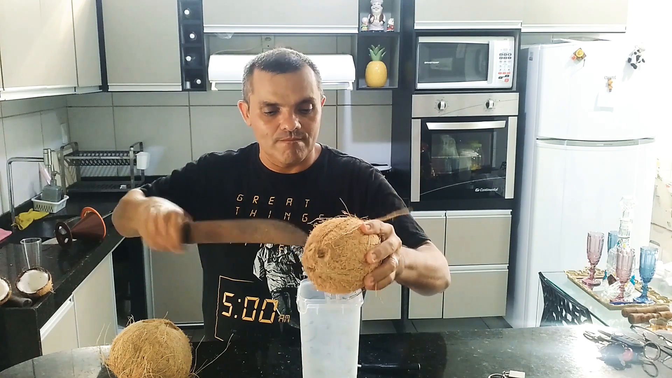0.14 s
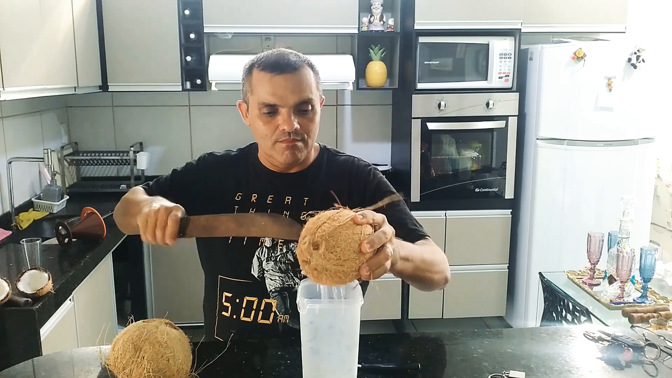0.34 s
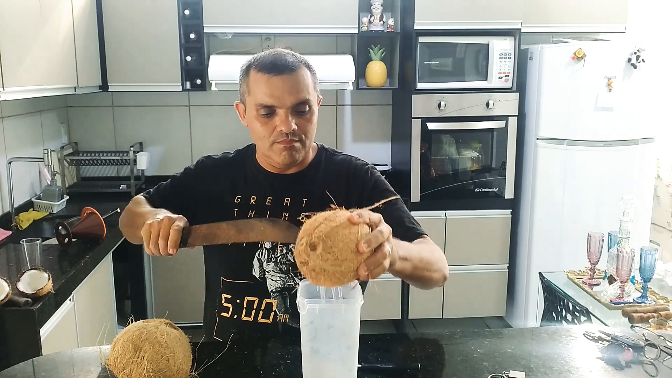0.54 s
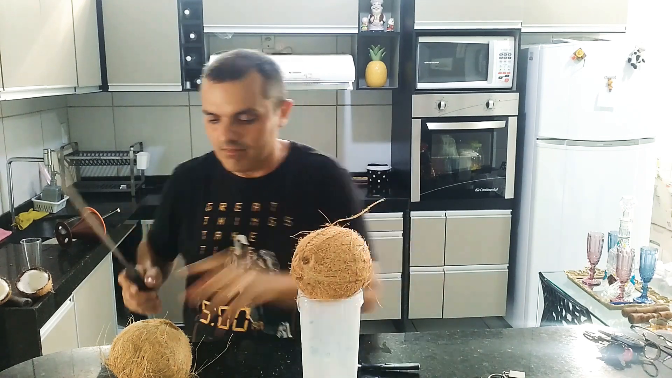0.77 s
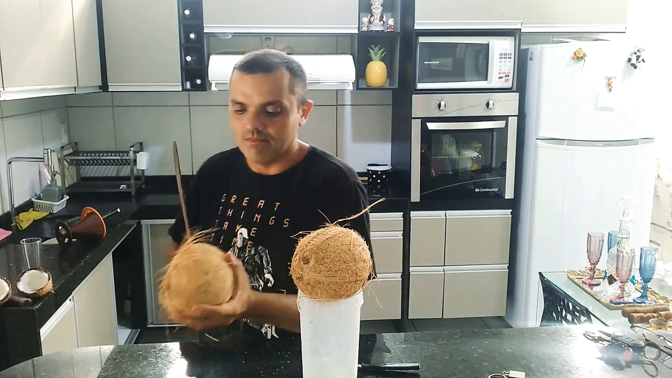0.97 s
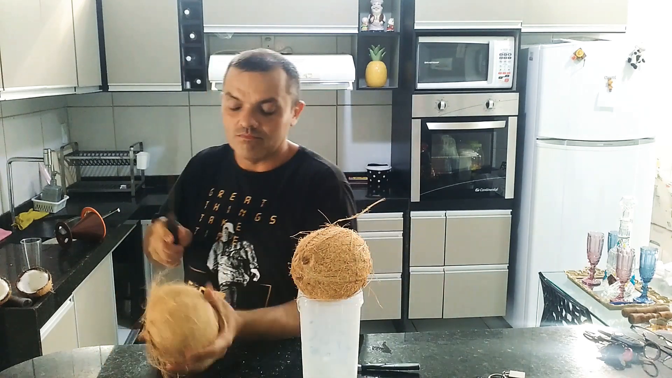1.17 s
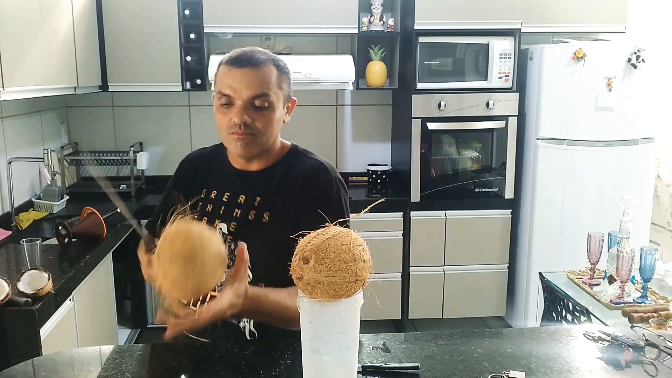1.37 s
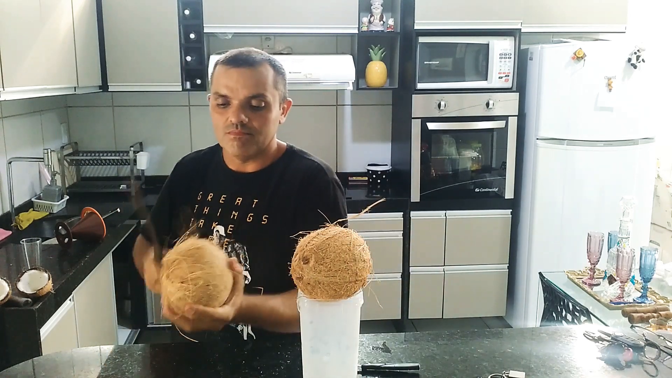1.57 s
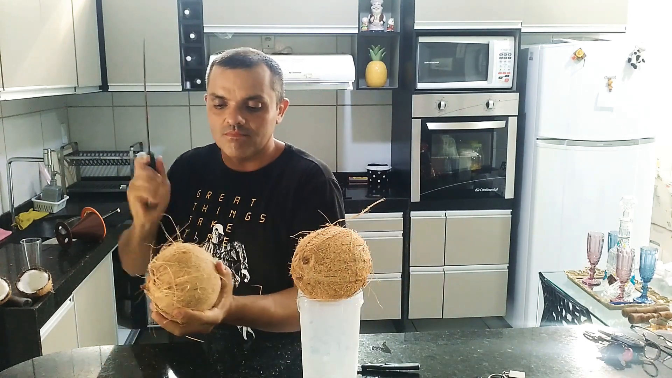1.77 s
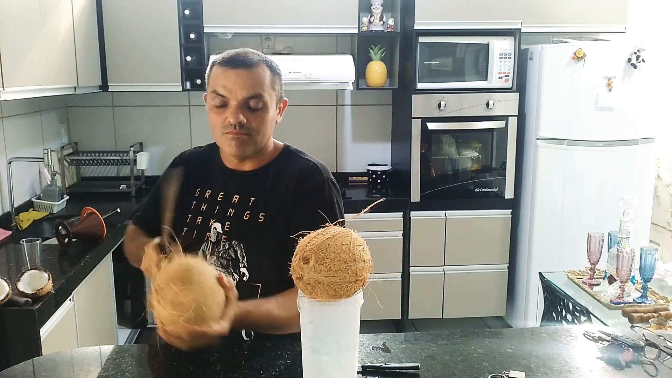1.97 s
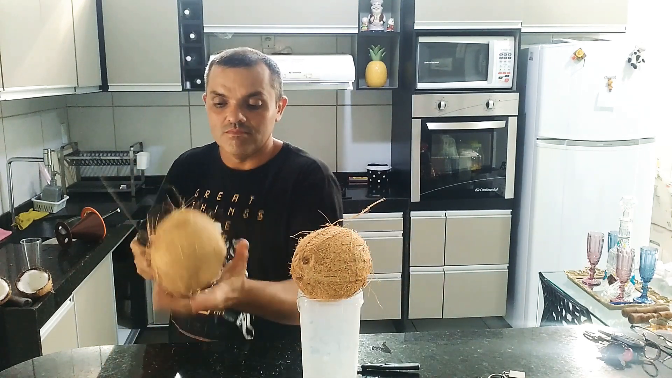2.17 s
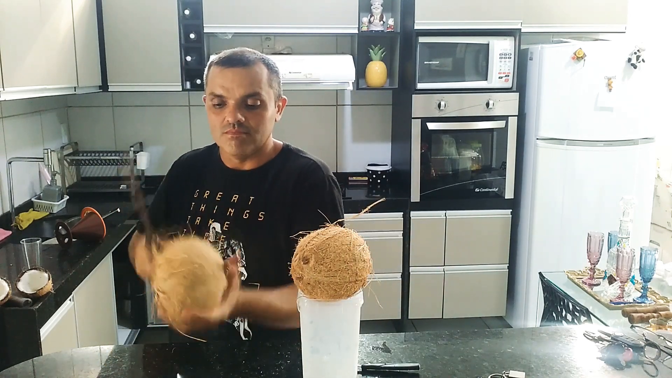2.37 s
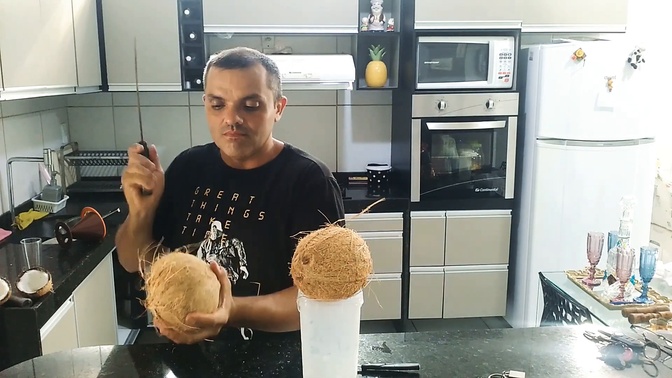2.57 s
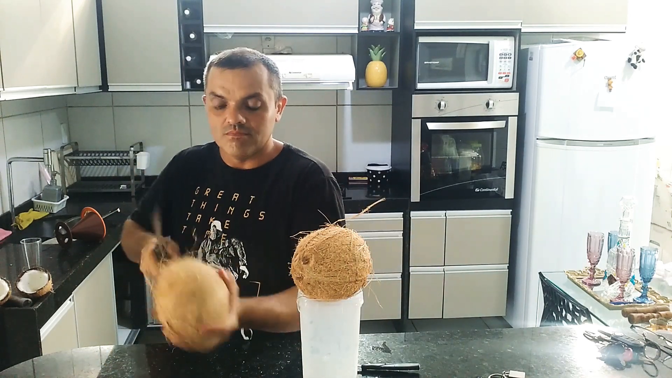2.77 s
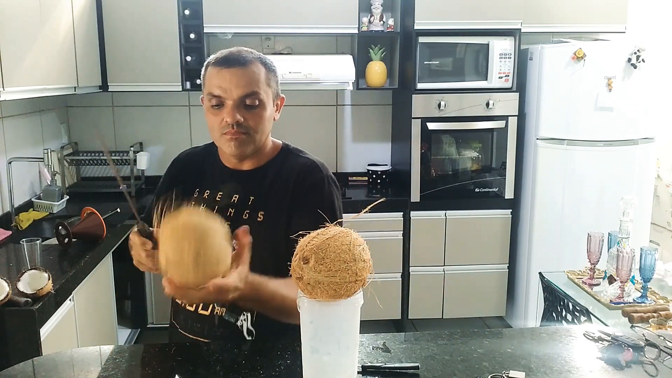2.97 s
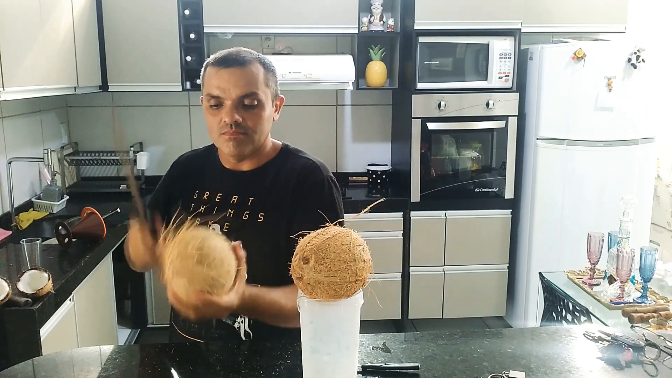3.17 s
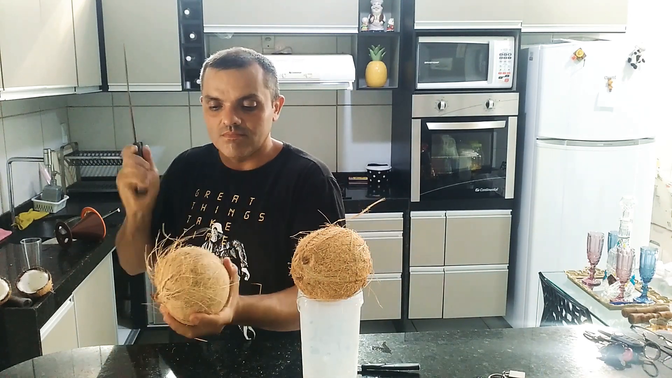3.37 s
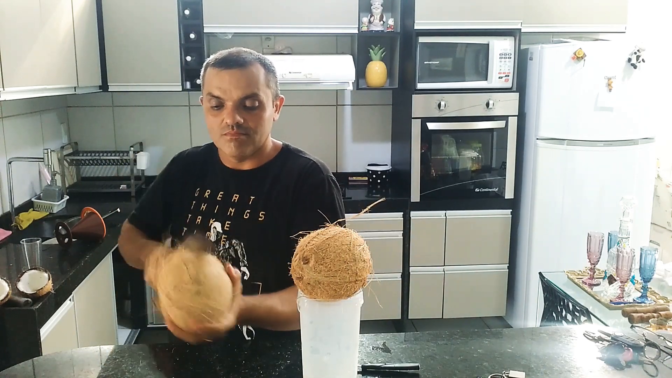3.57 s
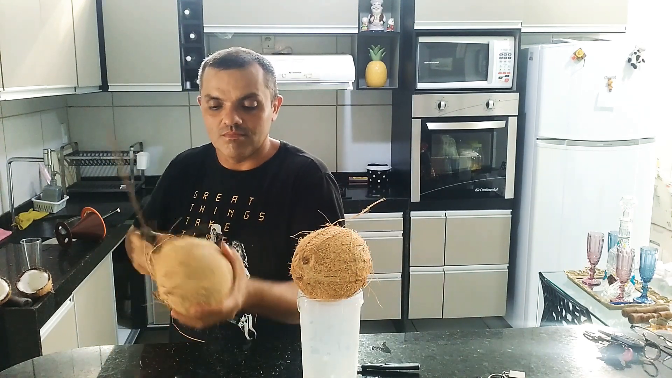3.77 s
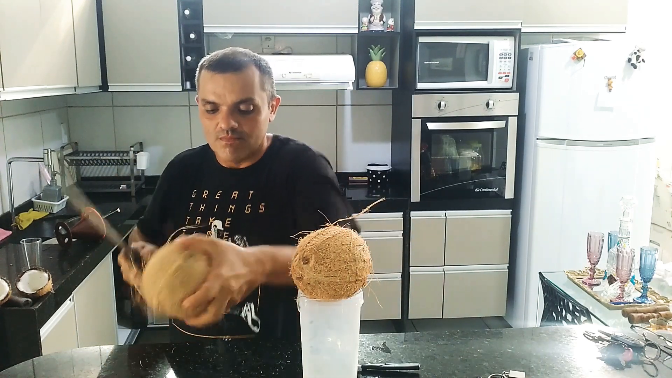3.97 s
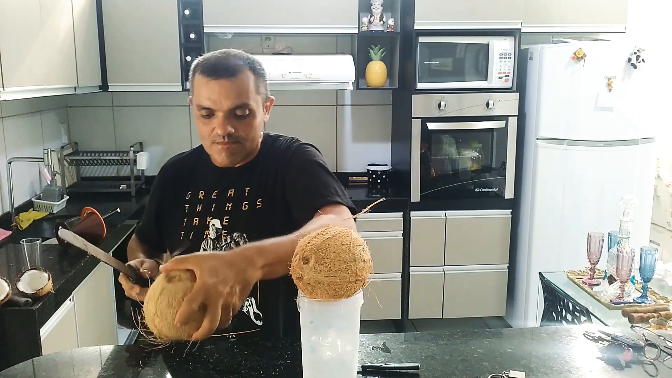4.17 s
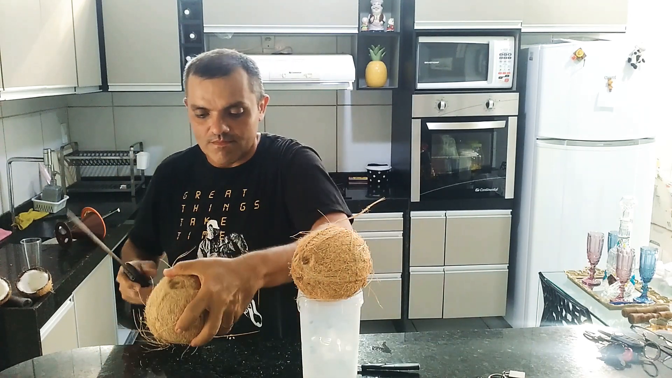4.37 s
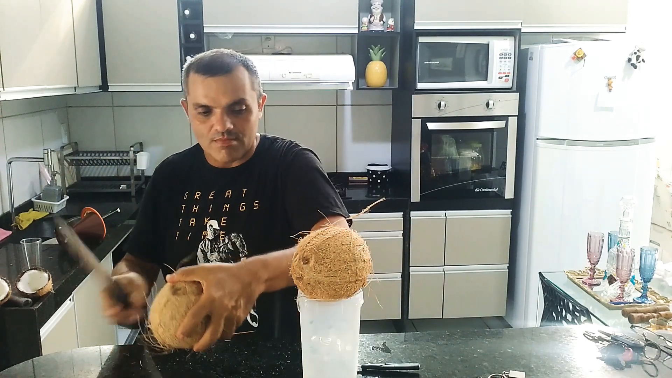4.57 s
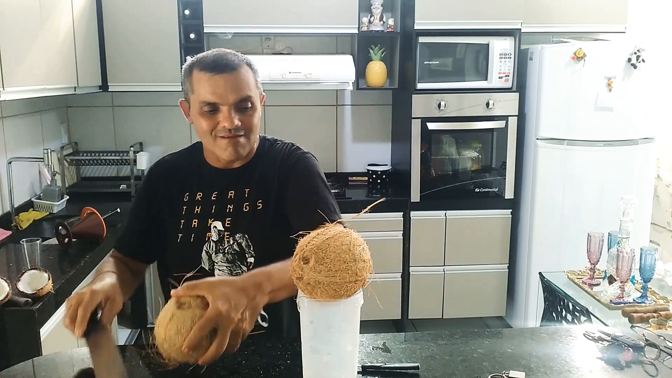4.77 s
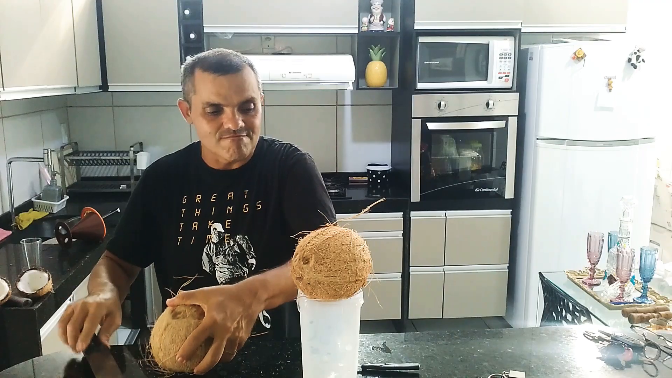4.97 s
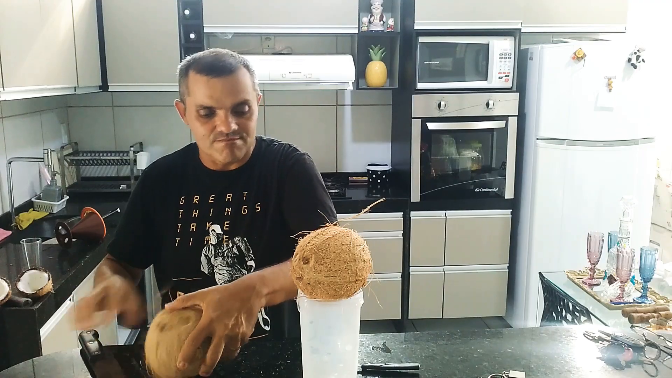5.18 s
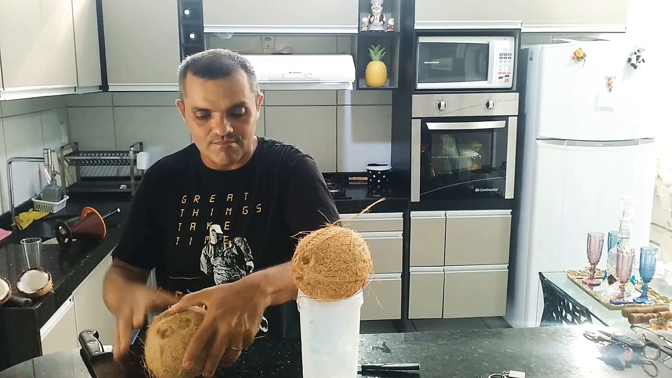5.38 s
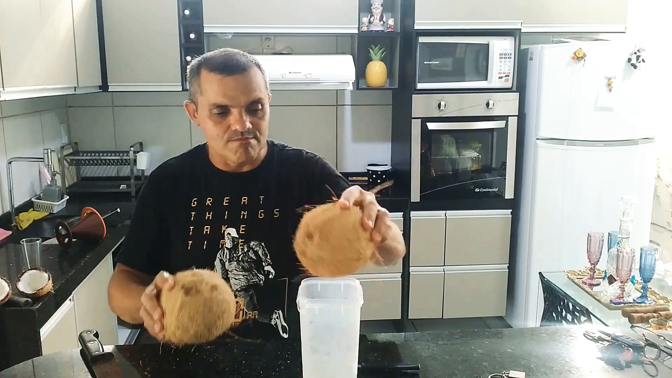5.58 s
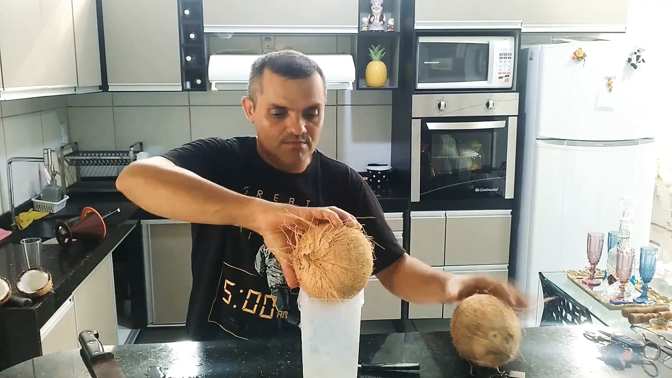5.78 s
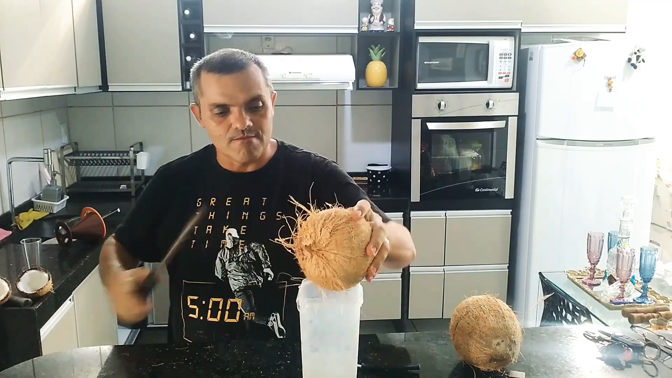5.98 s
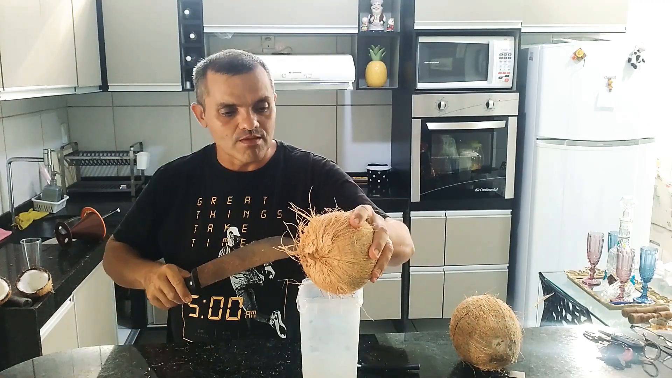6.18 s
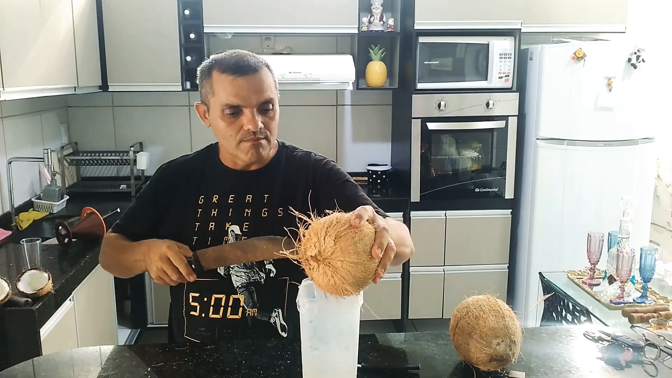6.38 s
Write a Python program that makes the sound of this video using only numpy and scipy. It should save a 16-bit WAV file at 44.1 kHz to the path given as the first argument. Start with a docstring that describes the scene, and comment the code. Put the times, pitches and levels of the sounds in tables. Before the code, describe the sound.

Four hard machete cracks on a dry coconut in a hard, echoing kitchen, then the blade clatters on a stone counter and husk rustles.

```python
"""Coconut cracked in a kitchen

A machete cracks a dry coconut four times in a hard tiled kitchen, then clatters onto a stone counter.
Blows and bounces are resonances excited through a noise-built room response, plus decaying tones.
Husk rustle, rubbing and scraping are filtered noise fed by random snaps; short bursts are husk snaps
and the nut set down on stone. Filtered noise lies faintly beneath.
The phone mutes the quiet of blows and clatter, flattens the peaks of the whole and cuts the top.
"""
import sys
import numpy as np
from scipy import signal
from scipy.fft import rfft, irfft, next_fast_len
from scipy.io import wavfile
from scipy.ndimage import uniform_filter1d

SR = 44100
rng = np.random.default_rng(int(sys.argv[2]) if len(sys.argv) > 2 else 0)


def digitize_waveform(pressure):
    """Quantize a signal to 16-bit integers and store it at the path in sys.argv[1].

    Rows of a 2-D input are taken as channels; values are limited to [-1, 1].
    """
    field = np.atleast_2d(pressure).T
    bounded = np.clip(field, -1, 1)
    quanta = np.round(bounded * 32767).astype(np.int16)
    wavfile.write(sys.argv[1], SR, quanta)


N = 284004

# Levels are relative unless called peak; w/Hz is the width of a resonance.
# blows: [t/s, level/dB, hollowness/dB, tilt/(dB per octave), favoured f/Hz]
BLOWS = [(1.167, 12, -20, 0.2, 3330), (1.996, 10.5, -23, 1.5, 10500), (2.797, 13, -16.5, -0.27, 2260),
         (3.596, 11, 6, 0.07, 9170)]
# resonances of nut and blade, from the hollow upwards: [f/Hz, w/Hz, level/dB]
HOLLOW_MODES = [(177, 52, 0), (264, 45, 1.5), (325, 60, 0.5), (422, 35, -1.5)]
KNOCK_MODES = [(60.1, 60, -20.5), (435, 200, -0.5), (650, 250, 2.5)]
BODY_MODES = [(953, 434, -0.5), (1359, 550, -2.5)]
CRACK_MODES = [(2100, 350, 0.0041), (2450, 380, 0.00027)]
SNAP_MODES = [(3050, 550, -2.1), (3492, 440, -0.93)]
BLADE_MODES = [(4700, 820, -3.5), (6070, 560, -2.5), (7300, 900, -1), (9100, 1100, -1.5)]
AIR_MODES = [(9770, 1800, -5.5), (13200, 11000, -18)]
# narrow rough bands that outlast the room: [f/Hz, w/Hz of each of two stages, level/dB, T60/s]
LINGER_BANDS = [(460, 380, -27, 0.75), (631, 24, -28.5, 0.91), (1506, 100, -32.5, 0.65),
                (2085, 210, -24, 0.77), (2250, 520, -28.5, 0.92), (6576, 170, -34, 0.73)]
# slow-dying tones of nut, room and blade: [f/Hz, level/dB, T60/s]
BOOM_TONES = [(136.6, -18, .6), (261, -25, 0.9), (382, -22, 0.45), (450, -28.5, 0.43), (566, -23, 0.47)]
SHELL_TONES = [(488, -29, 0.98), (650, -26.5, 0.7), (1123, -29, 1), (1398, -32, 0.72), (2025, -29, 0.87),
               (2266, -26.5, 0.94), (2300, -25.5, 0.63), (3435, -30, .55), (4560, -25, 0.91),
               (5730, -27, 0.84), (7800, -29.5, .5)]
BLADE_TONES = [(132, -44, 0.93), (246, -41.5, 0.62), (937, -35, 0.55), (1100, -31, 0.49), (6600, -28, .5),
               (7425, -28.5, .5), (7180, -25, .5), (8300, -19, .5), (8550, -44.5, 0.17),
               (8650, -34.5, 0.45), (9470, -18.5, .45)]
# blade bouncing on stone: [t/s, level/dB]
BOUNCES = [(4.938, 6.5), (4.943, -11.5), (4.962, -0.5), (4.994, -8), (5.012, -10.5), (5.052, -4),
           (5.158, -2.5), (5.162, 6.5), (5.194, 3), (5.260, 1)]
# blade chattering before it lies still: [t/s, length/s, level/dB]
CHATTERS = [(5.201, .05, -17), (5.267, .034, -14)]
# resonances of counter and blade: [f/Hz, w/Hz, level/dB]
COUNTER_MODES = [(90, 100, -28.5), (208, 31, -12), (459, 440, -19.5), (932, 180, -11.5), (1176, 250, -12),
                 (2560, 2900, -17.5), (4970, 2600, -11.5), (7290, 1610, -2.5), (8540, 1700, -0.5),
                 (10670, 2200, -7.5), (14000, 5000, -20)]
# husk snaps: [t/s, peak level/dB, f/Hz]
HUSK_SNAPS = [(0.412, -46, 3930), (0.454, -31, 4450), (0.552, -40, 4000), (0.574, -36, 4050),
              (0.623, -28, 3830), (0.716, -37, 8800), (0.85, -41, 3760), (0.929, -41.5, 3250),
              (1.007, -37.5, 9020), (1.887, -30.5, 5460), (1.904, -31.5, 4960), (1.929, -39.5, 6820),
              (4.47, -66, 4700), (4.835, -67, 4000), (5.597, -52, 2050), (5.795, -39, 7900),
              (5.844, -38.5, 5790), (5.862, -44, 9600), (5.873, -45, 7900), (5.906, -41, 6930),
              (5.994, -43, 5880), (6.04, -46, 3850), (6.089, -41, 5840), (6.186, -43.5, 9310),
              (6.203, -33, 9850), (6.308, -38, 4230), (6.404, -42.5, 3390)]
# nut set down on stone: [t/s, peak level/dB, T60/s (at least 0.01 is used)]
SET_DOWNS = [(5.739, -20, 0.11), (5.750, -25, 0), (5.763, -23, 0.15), (5.777, -28, .16),
             (5.808, -31.5, .16), (5.819, -40, 0.04), (5.931, -40, .14)]
# resonances of the nut on stone: [f/Hz, w/Hz, level/dB]
NUT_MODES = [(80.2, 62, -43), (750, 380, -7.5), (1127, 81, 2), (1316, 71, 1), (1636, 110, 2.5),
             (2280, 470, -10.5), (3400, 540, -13.5), (4370, 990, -23.5)]
# husk rustle, one curve per spell of handling: [t/s, fibre rasp level/dB, fine hiss level/dB]
RUSTLE_SPELLS = [
    [(0.0, -47, -56), (0.058, -64, -72), (0.076, -53, -61), (0.148, -60.5, -65), (0.304, -52.5, -50),
     (0.482, -46, -51.5), (0.532, -47, -53), (0.572, -42, -52.5), (0.748, -62, -60.5),
     (0.998, -59.5, -56.5), (1.07, -72, -60)],
    [(1.075, -61, -69.5), (1.168, -62, -61.5)],
    [(1.7, -59, -58.5), (1.87, -59.5, -68), (1.89, -55.5, -54), (1.975, -58, -54.5), (1.995, -71, -66.5)],
    [(5.85, -59, -55), (5.868, -81, -59), (5.926, -56, -64), (6.156, -57.5, -57), (6.174, -66, -64),
     (6.208, -53, -56.5), (6.236, -58.5, -63), (6.362, -57.5, -61), (6.39, -75.5, -76), (6.404, -51, -62),
     (6.44, -51, -54)],
]
# resonances of rasp, hiss and topmost hiss: [f/Hz, w/Hz, level/dB]
RASP_MODES = [(3222, 550, 0.5), (3540, 550, 1), (4130, 980, 4), (5920, 990, -3.5)]
HISS_MODES = [(7200, 3400, 0.5), (8900, 1900, 2), (11000, 1700, -8.5)]
FIZZ_MODES = [(13400, 3300, -1), (15000, 2200, -1)]
# nut rubbing on its rest or in the palm: [t/s, length/s, level/dB, multiple of the modes' f and w]
RUBS = [(0, 0.023, -64.5, 1), (.075, 0.029, -66, 1), (.128, 0.021, -42.5, 1.15), (.19, 0.018, -52, .9),
        (.29, 0.051, -54, 1), (.345, 0.081, -59, .85), (.46, 0.032, -57, .9), (.51, 0.033, -50.5, 1),
        (.56, 0.073, -57, .95), (.69, .02, -66, .9), (.81, 0.043, -65.5, 1.1), (.875, 0.016, -60, 1),
        (1.075, 0.1, -67, 1.2), (1.905, 0.037, -61.5, 1.1), (6.33, .02, -72, 1)]
# blade scraping the shell: [t/s, length/s, level/dB, multiple of the modes' f and w]
SCRAPES = [(0, .04, -57.5, 1.1), (.06, .08, -58, 1.04), (.2, .2, -66.5, 1.03), (.54, .06, -74, 1),
           (.622, .035, -54, 0.98), (.93, .04, -66, 1.3), (1.075, .09, -65, 0.8), (1.65, 0.058, -50, 0.73),
           (1.815, .025, -58, 0.79), (1.905, .07, -56, 0.66), (5.91, 0.041, -58, 1.07),
           (6.4, .04, -64, 1.1)]
# resonances of rubbing and scraping: [f/Hz, w/Hz, level/dB]
RUB_MODES = [(374, 130, -0.5), (521.5, 250, 0), (1054, 64, -3.5)]
SCRAPE_MODES = [(1520, 88, -6), (1800, 150, -4), (2020, 120, 2.5)]
# steady background, used for two equal stages: [f/Hz, w/Hz, level/dB of one stage]
RUMBLE_MODES = [(70, 54, -5), (176, 15, -1), (260, 20, -14), (630, 20, -11), (3000, 5000, -22.5)]
WHINE_MODES = [(450, 200, -1.5), (1060, 110, -0.5), (1580, 60, -7.5), (60, 100, -11), (3300, 1500, -15),
               (8000, 7800, -11.5)]
# reverberation time of the kitchen: [f/Hz, T60/s]
KITCHEN_T60 = [(64, 0.78), (128, 0.77), (256, .8), (512, 0.71), (1024, 0.72), (2048, 0.7), (4096, 0.64),
               (8192, 0.55), (16384, 0.22)]
# stereo width of room response: [f/Hz, side minus mid level/dB]
STEREO_WIDTH = [(60, 4), (150, -12.5), (300, -12.5), (600, -8.5), (1200, -0.5)]

# blows
FAVOUR_DB, FAVOUR_OCT, AIR_DB = 3.5, .3, 2.5
LINGER_DB, LINGER_LOST_PER_DB = -9, 0.6025  # the hollower the nut, the less its shell lingers
SHELL_DB, SHELL_LOST_PER_DB = -6, 0.0637
GRAIN_S, GRAIN_DB = .012, -8  # decay constant and share of the dense modes
WAVER = .006  # line width of a tone as a share of its pitch
# clatter
CHATTER_PER_S, CHATTER_CONTACT_S = 800, .00008
DROP_S, DROP_FADE_S, DROP_DB = 5.517, .011, -6
# handling
SNAP_T60_S = .06
STROKE_ATTACK_S, STROKE_T60_S = 0.002, 0.16
FIZZ_OFF_S, FIZZ_DB = (1.07, 5.8), -2  # the topmost hiss is missing while the blows fall
FLICKER_DB, FLICKER_PER_S = 1.5, 16  # spread before smoothing, new values per second
# background, balance and phone
RUMBLE_DB, RUMBLE_S, WHINE_DB = -77, (1.8, 4.93), -76
LEFT_DB = 2.5  # left is raised and right lowered by this much
MUTE_DB, MUTE_SLOPE, MUTE_BINS = -74.5, 0.97, 5  # threshold, dB lost per dB below it, smoothing
TOP_HZ = 15600


def blows():
    """Modal excitation: where the edge lands colours the resonances; each blow sounds from a new spot."""
    out = 0
    raised_air = [(f, w, g + AIR_DB) for f, w, g in AIR_MODES]
    shell = KNOCK_MODES + BODY_MODES + CRACK_MODES + SNAP_MODES + BLADE_MODES + raised_air
    for s, db, hollow_db, tilt, favoured_hz in BLOWS:
        modes = [(f, w, g + hollow_db) for f, w, g in HOLLOW_MODES]
        for f, w, g in shell:
            tilt_db = tilt * np.log2(f / 2000)
            favour_db = FAVOUR_DB * np.exp(-(np.log2(f / favoured_hz) / FAVOUR_OCT) ** 2)
            modes.append((f, w, g + tilt_db + favour_db))
        sound = grain(ring(kitchen(-3, .02, .003), modes))
        sound = sound + undb(LINGER_DB - LINGER_LOST_PER_DB * hollow_db) * linger()
        sound = sound + undb(hollow_db) * tones(BOOM_TONES)
        sound = sound + undb(SHELL_DB - SHELL_LOST_PER_DB * hollow_db) * tones(SHELL_TONES)
        out = out + place(s, undb(db) * sound)
    return out


def clatter():
    """Repeated impact: bounces ring blade and counter from one spot; light chatter hardly wakes the room."""
    bounce = grain(ring(kitchen(10, .004, .0004), COUNTER_MODES)) + tones(BLADE_TONES, .002)
    out = sum(place(s, undb(db) * bounce) for s, db in BOUNCES)
    light = grain(ring(kitchen(18.2, .003, 0.00036), COUNTER_MODES))
    # a contact of finite length, of unit area
    contact_t = np.arange(-8, 9) / SR
    contact = np.exp(-(contact_t / CHATTER_CONTACT_S) ** 2 * np.pi) / (CHATTER_CONTACT_S * SR)
    for s, length, db in CHATTERS:
        ticks = (rng.random(4096) < CHATTER_PER_S / SR) * rng.standard_normal(4096)
        ticks = np.convolve(ticks * (np.arange(4096) < length * SR), contact)
        out = out + place(s, undb(db) * signal.fftconvolve(light, ticks[None], axes=1))
    return out


def taps():
    """Impulsive excitation: husk snaps ring around one pitch each; the nut knocks on the counter."""
    out = 0
    for s, db, hz in HUSK_SNAPS:
        modes = [(hz, 0.12 * hz, 0), (0.89 * hz, 0.19 * hz, 0), (2 * hz, 2 * hz, -24)]
        out = out + burst(s, db, SNAP_T60_S, modes)
    for s, db, t60 in SET_DOWNS:
        out = out + burst(s, db, t60, NUT_MODES)
    return out


def rustle():
    """Friction noise: husk fibres dragged by hand and blade; rasp, hiss and topmost hiss each flicker."""
    t = np.arange(N) / SR
    rasp, hiss = 0, 0
    for spell in RUSTLE_SPELLS:
        times, rasp_db, hiss_db = np.transpose(spell)
        rasp = rasp + undb(np.interp(t, times, rasp_db, -140, -140))
        hiss = hiss + undb(np.interp(t, times, hiss_db, -140, -140))
    fizz = hiss * undb(FIZZ_DB) * ((t < FIZZ_OFF_S[0]) | (t > FIZZ_OFF_S[1]))
    out = 0
    for gain, modes in ((rasp, RASP_MODES), (hiss, HISS_MODES), (fizz, FIZZ_MODES)):
        out = out + gain * flicker() * unit(sum(map(fibres, modes)))
    out = out + strokes(RUBS, RUB_MODES) + strokes(SCRAPES, SCRAPE_MODES)
    return np.sqrt(2) * out * balance()  # unrelated at the two ports


def hum():
    """Stationary coloured noise: a low rumble for one span, a thinner whine for the rest."""
    t = np.arange(N) / SR
    rumble = unit(ring(rng.standard_normal((2, N)), RUMBLE_MODES, RUMBLE_MODES))
    whine = unit(ring(rng.standard_normal((2, N)), WHINE_MODES, WHINE_MODES))
    in_rumble = (t > RUMBLE_S[0]) & (t < RUMBLE_S[1])
    return np.where(in_rumble, undb(RUMBLE_DB) * rumble, undb(WHINE_DB) * whine)


def kitchen(early_db, early_s, rise_s, size=49152):
    """Reverberation: a dense burst off the nearest surfaces, then echoes that die faster in the treble."""
    t, hz = np.arange(size) / SR, np.fft.rfftfreq(size, 1 / SR)
    mid, side = rfft(rng.standard_normal((2, size)))
    side = side * undb(along(STEREO_WIDTH, hz))
    ears, out = np.array([mid + side, mid - side]) / 2, 0
    for k in range(10):  # overlapping octave bands
        share = np.cos(np.pi / 2 * np.clip(np.log2(hz / 32 + 1e-9) - k, -1, 1)) ** 2
        decay = np.exp(-np.log(1000) * t / along(KITCHEN_T60, 32 * 2 ** k))
        out = out + irfft(ears * share, size) * decay
    early = 1 + undb(early_db) * np.exp(-t / early_s)
    return out * early * (1 - np.exp(-t / rise_s)) ** 2 * balance()


def grain(x):
    """High modal density: short-lived modes give a struck body a new lumpy colour every time."""
    t = np.arange(2048) / SR
    modes = rng.standard_normal(len(t)) * np.exp(-t / GRAIN_S)
    modes = undb(GRAIN_DB) * modes / np.sqrt(np.sum(modes ** 2))
    direct = x * np.sqrt(np.abs(1 - undb(2 * GRAIN_DB)))
    return direct + signal.fftconvolve(x, modes[None], axes=1)[:, :x.shape[1]]


def linger(size=49152):
    """Exponential decay: narrow bands of noise, each with a slow decay of its own."""
    t, out = np.arange(size) / SR, 0
    for hz, width, db, t60 in LINGER_BANDS:
        stage = [(hz, width, 0)]
        band = unit(ring(rng.standard_normal((2, size)), stage, stage))
        out = out + undb(db - 60 * t / t60) / 2 * band
    return out * (1 - np.exp(-t / 0.0058)) * balance()


def tones(table, swell_s=0.099, size=49152):
    """Damped vibration: sines swell in and decay; the higher the tone, the less alike at the two ports."""
    t, out = np.arange(size) / SR, 0
    for hz, db, t60 in table:
        start, apart, detune = rng.uniform(-0.89, 1, 3)
        phase = np.pi * (start + min(hz / 1000, 1) * apart * np.array([[0], [1]]))
        # the pitch wavers: a random walk of phase
        phase = phase + np.cumsum(rng.standard_normal(size)) * np.sqrt(2 * np.pi * WAVER * hz / SR)
        sine = np.sin(2 * np.pi * hz * (1 + 0.0017 * detune) * t + phase)
        out = out + undb(db - 60 * t / t60) / 2 * sine
    return out * (1 - np.exp(-t / swell_s)) * balance()


def burst(s, db, t60, modes):
    """Transient response: a sharp snap and a noisy decay pass through some resonances."""
    t = np.arange(8192) / SR
    decay = undb(-60 * t / max(t60, .01)) * (1 + np.exp(-t / 0.0012))
    noise = rng.standard_normal((2, len(t))) * decay
    sound = ring(noise + .5 * noise[0], modes)  # partly shared by the two ports
    return place(s, undb(db) * sound / np.abs(sound).max())


def strokes(table, modes):
    """Friction under an envelope: every stroke rises fast, holds for its length and dies away."""
    t, out = np.arange(16384) / SR, 0
    for s, length, db, pitch in table:
        fall_db = 60 * np.clip(t - length, 0, 1) / STROKE_T60_S
        gain = np.clip(t / STROKE_ATTACK_S, 0, 1) * undb(db - fall_db)
        rub = sum(fibres((pitch * f, pitch * w, g), size=len(t)) for f, w, g in modes)
        out = out + place(s, gain * unit(rub))
    return out


def fibres(mode, rate=60, tail_s=0.021, size=N):
    """Stick-slip: one resonance is fed by noise that starts in uneven snaps and trails off."""
    strength = undb(5.4 * np.minimum(rng.exponential(size=size), 3))
    snaps = (rng.random(size) < rate / SR) * strength
    push = 0.85 + signal.lfilter([1], [1, -np.exp(-1 / (tail_s * SR))], snaps)
    return ring(push * rng.standard_normal((2, size)), [mode], [(mode[0], 1.1 * mode[1], 0)])


def flicker():
    """Amplitude modulation: a gain that wanders a few dB, slewed."""
    k = int(SR / FLICKER_PER_S)
    steps = np.repeat(rng.standard_normal(N // k + 1), k)
    return undb(FLICKER_DB * uniform_filter1d(steps, k // 2)[:N])


def ring(x, *stages):
    """Modal superposition: x passes through sums of causal resonances, one stage after the other."""
    size = next_fast_len(x.shape[-1])
    hz, out = np.fft.rfftfreq(size, 1 / SR) + 1e-3, rfft(x, size)
    for modes in stages:
        response = 0
        for k, (f, w, db) in enumerate(modes):  # neighbours alternate in sign
            response = response + (-1) ** k * undb(db) / (1 + 1j * (hz ** 2 - f ** 2) / (hz * w))
        out = out * response
    return irfft(out, size)[..., :x.shape[-1]]


def place(s, sound):
    """Superposition in time: lays a stereo sound on the time line."""
    out, i = np.zeros((2, N)), int(s * SR)
    out[:, i:i + sound.shape[1]] = sound[:, :N - i]
    return out


def balance():
    """Interchannel level difference: gains that favour the left port."""
    return undb([[LEFT_DB], [-LEFT_DB]])


def undb(db):
    """Level definition: amplitude ratio from decibels."""
    return 10 ** (np.asarray(db) / 20)


def along(table, hz):
    """Logarithmic pitch scale: reads an (f/Hz, value) table on a log-frequency axis."""
    f, v = np.transpose(table)
    return np.interp(np.log(hz + 1e-9), np.log(f), v)


def unit(x):
    """Normalisation: scales to an RMS of one."""
    return x / np.sqrt(np.mean(x ** 2))


def mute(x):
    """Downward expansion: a suppressor pulls down narrow bands under its threshold, so strong bands linger."""
    bins = signal.stft(x, nperseg=1024, noverlap=768)[2]
    power = np.mean(np.abs(bins) ** 2, axis=0)
    power = uniform_filter1d(uniform_filter1d(power, MUTE_BINS, axis=0), size=3, axis=1)
    level_db = 10 * np.log10(np.abs(power) + 1e-18)
    gain = undb(MUTE_SLOPE * np.minimum(level_db - MUTE_DB, 0))
    return signal.istft(bins * gain, nperseg=1024, noverlap=768)[1][:, :N]


def scene():
    """Linear superposition: muted blows and clatter, handling sounds and background add up."""
    t = np.arange(N) / SR
    # blows and clatter step down together and quickly fade away
    fade = undb(DROP_DB) * np.exp(-np.clip(t - DROP_S, 0, 1) / DROP_FADE_S)
    drop = np.where(t < DROP_S, 1, fade)
    return mute(blows() + clatter()) * drop + taps() + rustle() + hum()


def record(dry):
    """Overload and band limitation: the phone flattens the peaks and cuts the top."""
    low_pass = signal.ellip(8, .2, 70, TOP_HZ, fs=SR, output="sos")
    return signal.sosfilt(low_pass, np.clip(dry, -.97, .97))


dry = scene()
out = record(dry)
digitize_waveform(out)
```